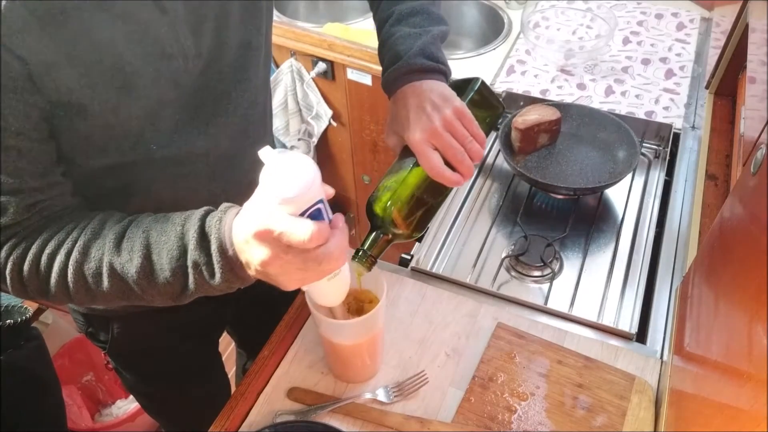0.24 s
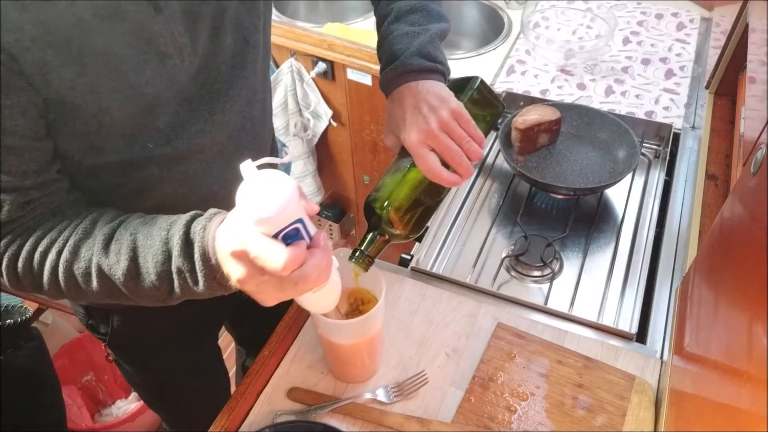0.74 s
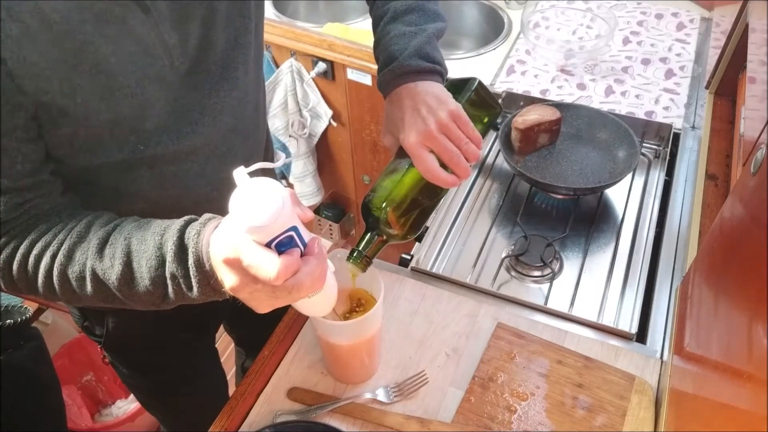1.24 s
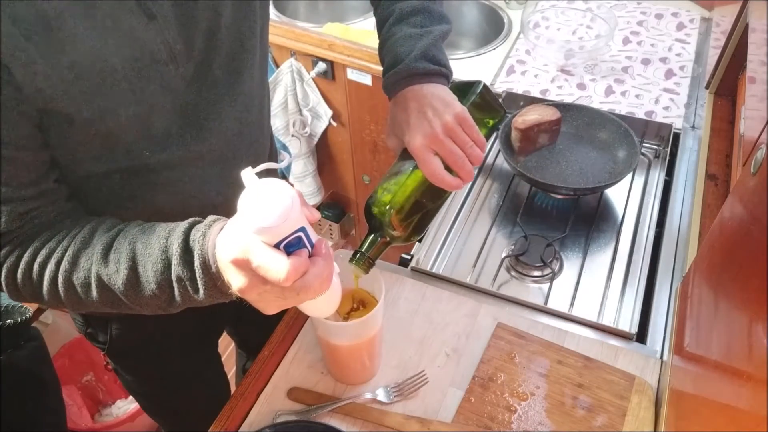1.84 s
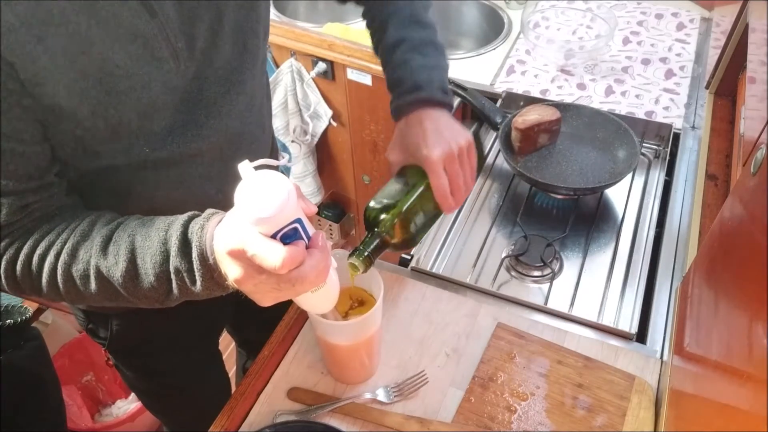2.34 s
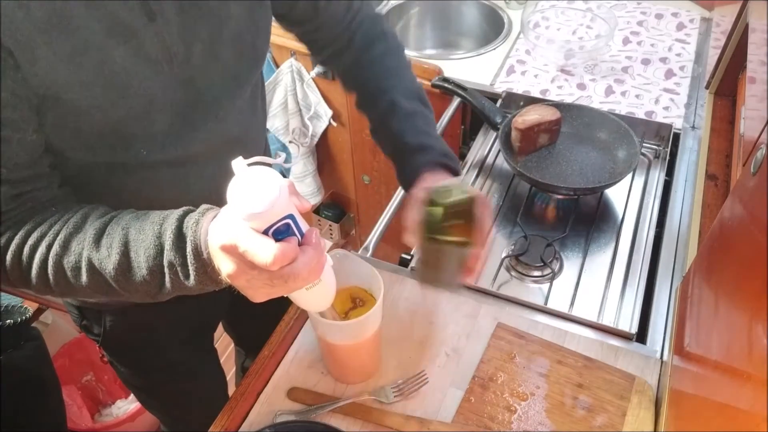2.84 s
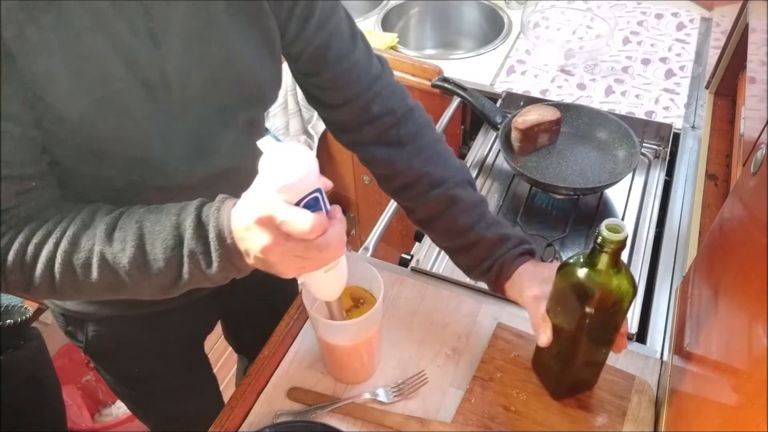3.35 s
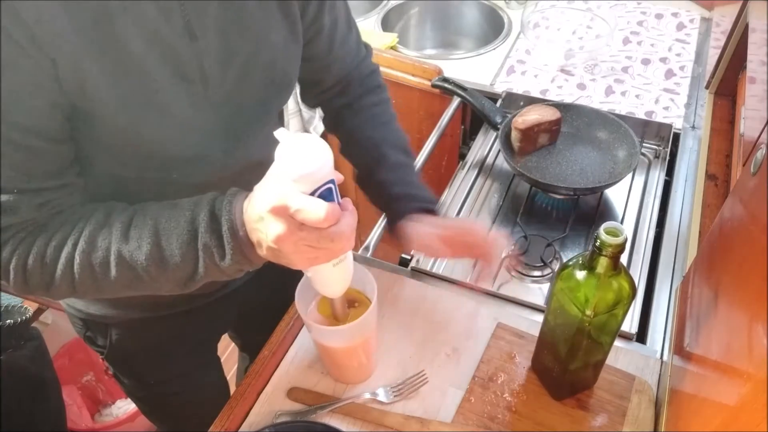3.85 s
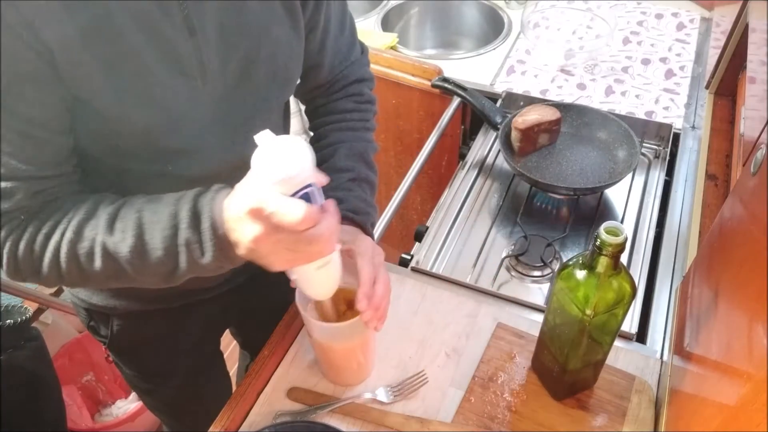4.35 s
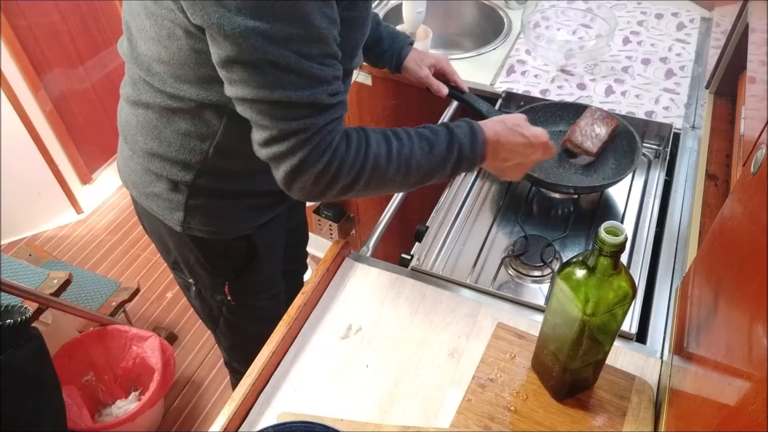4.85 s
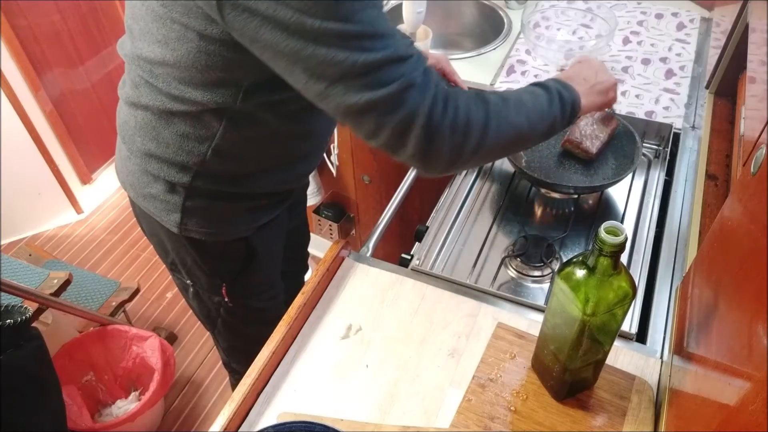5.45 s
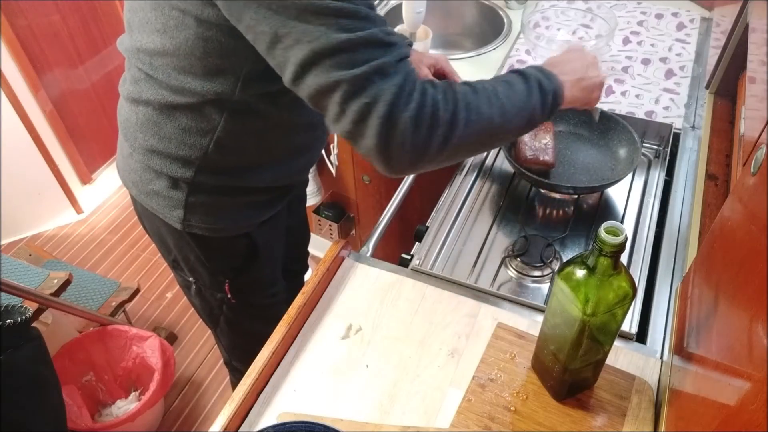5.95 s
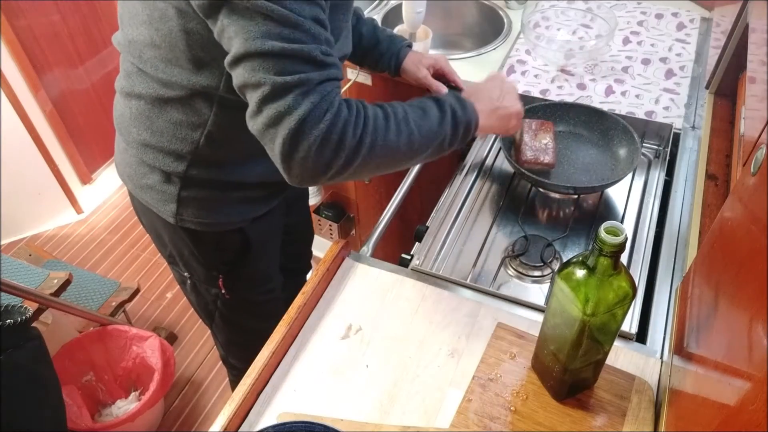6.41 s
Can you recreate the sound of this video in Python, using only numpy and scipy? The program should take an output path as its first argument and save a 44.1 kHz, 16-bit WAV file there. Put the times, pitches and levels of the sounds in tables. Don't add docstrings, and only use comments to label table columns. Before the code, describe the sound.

Close up in a small wooden galley, a stick blender coasts to a stop, then buzzes and churns thick sauce in a plastic beaker. Fat spits sharply in a pan throughout. The blender stops, a glass bottle lands on a board with a hard thud, and a splashier, uneven blender run follows. An abrupt cut leaves dense fish sizzle, a low burner roar and wind buffeting the microphones.

```python
import sys
import numpy as np
from scipy import signal
from scipy.fft import rfft, irfft
from scipy.io import wavfile
from scipy.ndimage import uniform_filter1d

SR = 44100
rng = np.random.default_rng(int(sys.argv[2]) if len(sys.argv) > 2 else 0)


def master(y):
    cut = np.clip(np.atleast_2d(y).T, -1, 1)
    pcm = np.round(cut * 32767)
    wavfile.write(sys.argv[1], SR, pcm.astype(np.int16))


def voltage_ratio(level):
    return 10 ** (np.asarray(level, float) / 20)


N = 294588
T, HZ = np.arange(N) / SR, np.fft.rfftfreq(N, 1 / SR)
SIDES = np.array([[.5], [-.5]])
CHANGE_S = 4.82
COAST_S = .45
PAN_SAME, PAN_LAG = .4, 51


def evened(x):
    return x / np.sqrt(np.mean(x ** 2) + 1e-20)


def read(points, hz=HZ):
    f, value = np.transpose(points)
    return np.interp(np.log(hz + 1), np.log(f + 1), value)


def coloured(x, db):
    return irfft(rfft(x) * voltage_ratio(db), N)


def drift(hz, count=1):
    spacing = 64
    points = N // spacing + 2
    smoothing = 1 + (np.fft.rfftfreq(points, spacing / SR) / hz) ** 2
    slow = irfft(rfft(rng.standard_normal((count, points))) / smoothing, points)
    return evened(np.array([np.interp(np.arange(N) / spacing, np.arange(points), row) for row in slow]))


def bumps(rows):
    s, db, length = np.transpose(rows)[..., None]
    return (db * np.exp(-((T - s) / length) ** 2)).sum(0)


def paired(same, phase=0., balance_db=0.):
    a, b = rfft(rng.standard_normal((2, N)))
    same = np.clip(same, 0, 1)
    right = same * a * np.exp(-1j * phase) + np.sqrt(1 - same ** 2) * b
    return irfft(np.array([a * voltage_ratio(balance_db / 2), right * voltage_ratio(-balance_db / 2)]), N)


def add_at(out, s, sound):
    out[:, round(s * SR):][:, :sound.shape[1]] += sound


def galley(x, wet_db):
    # frequency in Hz, time to fall 60 dB in seconds
    room_decay = [(200, 0.26), (1000, 0.42), (4000, 0.14), (16000, 0.06)]
    taps = np.zeros((2, 16000))
    at = np.arange(60, 15900, 20) + rng.integers(0, 20, (2, 792))
    np.put_along_axis(taps, at, rng.choice([-1., 1.], at.shape), 1)
    hz, t, z = signal.stft(taps, SR, nperseg=256)
    dying = voltage_ratio(-60 * t / read(room_decay, hz)[:, None])
    tail = signal.istft(z * dying, SR, nperseg=256)[1]
    tail /= np.linalg.norm(tail[0])
    return x + voltage_ratio(wet_db) * signal.fftconvolve(x, tail, axes=1)[:, :N]


def motor(press, hand, run_hz):
    on_s, off_s, rise_s, churn_db, hum_db, hiss_db = press
    at, *columns = np.transpose(hand)
    lift_db, pressed_db = (np.interp(T, at, c) for c in columns)
    since, after = np.maximum(T - on_s, 0), np.clip(T - off_s, 0, COAST_S)
    short = .2 * np.exp(-since / .06)
    shaft_hz = run_hz * (1 - short) - 70 * after
    shaft_hz = shaft_hz - .45 * np.maximum(-lift_db - 3, 0)
    churn_db = churn_db - 14 * np.maximum(1 - since / rise_s, 0) ** 2 - .2 * lift_db
    churn_db = churn_db - 110 * after - 4 * (1 - np.exp(-after / 0.059))
    hum_db = hum_db + pressed_db - 108 * short * .7 - 400 * after
    over_db = np.minimum(hiss_db + lift_db + 28 * after, 0)
    end_s = min(off_s + COAST_S, CHANGE_S)
    on = np.clip(np.minimum(T - on_s, end_s - T) / .004, 0, 1)
    return on, shaft_hz, churn_db, hum_db, over_db


def resonate(x, hz, width):
    turn = np.exp(2j * np.pi * np.cumsum(hz * np.ones(N)) / SR)
    r = np.exp(-np.pi * width / SR)
    return 2 * (turn * signal.lfilter([1 - r], [1, -r], x / turn + 1e-18)).real


def ringing(x, body):
    shape = 0
    for k, (f, width, db) in enumerate(body):
        shape = shape + (-1) ** k * voltage_ratio(db) / np.sqrt(width) / (1 + 2j * (HZ - f) / width) ** 2
    return irfft(rfft(x) * shape, N)


def burst(controls, orders, body, hiss, main_width, main_db, slosh_db, hiss_db, follow):
    # frequency in Hz, left-right likeness
    near_same = [(100, 0.8), (200, 1), (360, 0.75), (730, 0.05), (900, 1.1), (1270, 0.54), (2100, 0.5),
                 (4400, 1.5), (9000, 1)]
    # frequency in Hz, radians by which the left leads
    near_phase = [(200, 0.27), (360, -2), (540, 2.3), (900, -0.5), (1040, -1.07), (1270, -3), (1660, 3),
                  (4400, -2.5), (6300, 0.5)]
    # frequency in Hz, left-right difference in dB
    near_balance = [(60, -1), (99, 2), (160, -4.5), (270, -2), (450, -9), (740, 3), (1220, -3), (2010, 0.5),
                    (3330, -1.5), (5500, -1.0), (9080, 1), (15000, 33)]
    # frequency in Hz, density in dB per Hz
    slosh_colour = [(35, -73), (68, -18), (129, -17), (176, -1), (252, -13), (415, -12), (664, -3.5),
                    (1010, -8.5), (1770, -12), (2500, -21), (3250, -65), (5500, -120)]
    press, hand, run_hz, air = controls
    on, shaft_hz, churn_db, hum_db, over_db = motor(press, hand, run_hz)
    air_s, *air = np.transpose(air)
    air_hz, surge_db = (np.interp(T, air_s, c) for c in air)

    turns = 2 * np.pi * np.cumsum(shaft_hz * (1 + .003 * drift(8)[0])) / SR
    wobble = voltage_ratio(0.73 * drift(5.9, count=len(orders) + 1))
    tone = np.sin(turns - np.array([[0], [.2]])) * voltage_ratio([[-1.3], [1.3]])
    hum = np.sqrt(2) * voltage_ratio(hum_db) * wobble[0] * tone
    for (k, db), w in zip(orders, wobble[1:]):
        skew, lean = read(near_phase, k * 182.), read(near_balance, k * 182.)
        tuned_db = 4. / (1 + ((k * shaft_hz - air_hz) / 25) ** 2)
        level = voltage_ratio(churn_db + db + tuned_db - 5 + lean * SIDES)
        hum += level * w * np.sin(k * turns + rng.uniform(0, 2 * np.pi) + skew * SIDES)

    stir = paired(read(near_same), read(near_phase), read(near_balance))
    stir *= (1 + 0.15 * np.cos(turns)) * voltage_ratio(1.21 * drift(18))
    column = resonate(stir, air_hz, main_width) / np.sqrt(main_width)
    slow = abs(uniform_filter1d((column ** 2).mean(0), size=1000)) / np.mean(column ** 2) + .05
    column_db = main_db + surge_db + 0.38 * follow * (over_db + 10.5)
    column = column * voltage_ratio(column_db) / slow ** (.75 / 2)
    walls = ringing(stir, body) * voltage_ratio(follow * (over_db + 4.5))
    beaker = column + walls
    churn = beaker / np.sqrt(np.mean(beaker[:, on > 0] ** 2))
    churn = churn + voltage_ratio(slosh_db) * evened(coloured(stir, read(slosh_colour)))

    mist = paired(.12, 0., read(near_balance))
    mist = mist * (1 + 0.11 * np.cos(turns)) * voltage_ratio(.9 * drift(21))
    spray = voltage_ratio(hiss_db + over_db) * evened(coloured(mist, read(hiss)))
    return on * (hum + voltage_ratio(churn_db + 2.5) * (churn + spray))


def blender():
    # on and off in seconds, rise in seconds, churn in dB, hum in dB,
    # blade hiss over churn in dB
    presses = [
        (-1.0, -0.1, .05, -20, -22, -6),
        (0.441, 2.315, 0.045, -20, -28.5, -8),
        (3.425, 9.0, .1, -21.5, -25.5, 1.5),
    ]
    # time in seconds, blade lift in dB, beaker on counter in dB
    hands = [
        [(0.0, 1, 3)],
        [(0.6, 1.5, -0.5), (0.76, 1, -2.5), (0.86, 1.5, -11), (0.95, 0.0, -0.5), (2.0, 0.5, 0.5),
         (2.3, 0.5, -1)],
        [(3.42, -3, -1), (3.5, -14.5, -10), (3.65, 1.5, 0.5), (4.4, -3, -1.5), (4.46, -5, -7), (4.55, -2, -8),
         (4.63, -11.5, -19), (4.8, -19.5, -6)],
    ]
    # time in seconds, pitch in Hz, surge in dB
    air_columns = [
        [(0, 1040, 0)],
        [(.46, 960, 0), (.5, 1005, 1), (.525, 1015, -3), (.55, 1035, 3), (.62, 1065, 0), (.71, 1020, 6),
         (.82, 1040, -4), (.86, 1065, 2), (.95, 1025, 1), (.972, 1015, -6), (1.004, 1010, 5), (1.05, 1027, 0.5),
         (1.34, 1023, -4.5), (1.37, 1013, 1), (1.64, 1020, -5), (1.736, 1024, 2.5), (1.76, 1022, -3.5),
         (2.3, 1027, -3)],
        [(3.47, 1000, -10), (3.485, 1010, 2), (3.53, 1052, 3), (3.59, 1055, 1), (3.64, 1005, -1),
         (3.74, 1045, 2), (3.79, 1040, -6), (3.95, 1020, -1), (4.0, 1030, -5), (4.15, 1035, -1),
         (4.38, 1000, -6), (4.45, 1000, 1), (4.51, 1005, 2), (4.57, 1000, -3), (4.62, 1063, 1),
         (4.66, 1063, -3), (4.75, 1060, 0), (4.82, 1052, -1)],
    ]
    # multiple of the shaft rate, level in dB
    orders_deep = [(2, -8.5), (3, -11.5), (4, -8), (5, -7.5), (6, -7.5), (7, 0.5), (12, -17), (14, -17)]
    orders_lifted = [(2, -12), (3, -19), (4, -31), (5, -12), (6, 3.5), (7, -2), (9, -8), (12, -26),
                     (14, -17)]
    # pitch in Hz, width in Hz, level in dB
    body_deep = [(730, 30, -10), (902, 85, -4), (1104, 79, -7), (1264, 75, 2), (1500, 300, -9.5)]
    body_lifted = [(240, 69, -11), (763, 40, -12), (885, 70, -6), (1250, 99, 5), (1655, 60, 0),
                   (2200, 89, -20)]
    # frequency in Hz, density in dB per Hz
    hiss_deep = [(45, -26), (90, -7), (1060, -15), (1800, -3.5), (2280, -4.5), (2610, 0), (3580, -3.5),
                 (4440, -4), (4840, -6), (6050, -10.5), (6560, -7), (7710, -15), (9000, -8), (11700, -17.5),
                 (19800, -120)]
    hiss_lifted = [(45, -18), (90, -15), (1060, -12.5), (1800, 1), (1900, -15), (2080, -1.5), (2360, -4.5),
                   (2650, -1), (3560, -6.5), (4570, -6.5), (5690, -10), (6330, -7.5), (7590, -12.5),
                   (8570, -11), (11000, -18.5), (14300, -41), (22000, -120)]
    run_hz = (181.3, 181.3, 184.6)
    first, second, third = zip(presses, hands, run_hz, air_columns)
    coast = burst(first, orders_deep, body_deep, hiss_deep,
                  main_width=200, main_db=-9, slosh_db=-3, hiss_db=7.0, follow=.05)
    deep = burst(second, orders_deep, body_deep, hiss_deep,
                 main_width=30, main_db=1.5, slosh_db=-8, hiss_db=2.0, follow=0.1)
    lifted = burst(third, orders_lifted, body_lifted, hiss_lifted,
                   main_width=40, main_db=5.0, slosh_db=-9, hiss_db=4.0, follow=.9)
    return coast + deep + lifted


def activity(flurries, calm_db):
    s, db, rise, fall = np.transpose(flurries)[..., None]
    swell = voltage_ratio(db) * np.exp(-np.where(T < s, (s - T) / rise, (T - s) / fall))
    return 10 * np.log10(voltage_ratio(calm_db) ** 2 + (swell ** 2).sum(0))


def frying(flurries, colour, calm_db, low_db, per_s, spread_db, clump_db, smooth_db, low_hz, wet_db):
    # time in seconds, change in dB, length in seconds
    lulls = [(.08, 0, .02), (.2, -1, 0.034), (2.617, -6, 0.014), (2.697, -4, .007), (2.73, -1, 0.013),
             (3.32, 0, .01)]
    # frequency in Hz, left-right difference in dB
    pan_balance = [(60, -2), (110, -3), (200, -4), (380, -12), (700, 5), (1290, -1.5), (2380, -1.5),
                   (4400, -2), (8120, 0.5), (15000, 5.5)]
    fizz_db = activity(flurries, calm_db) + bumps(lulls)
    low_db = low_db - 0.59 * np.maximum(fizz_db - calm_db, 0)
    low_db = low_db + 6 * np.clip((T - 5.89) / 0.027, 0, 1)

    clumps = voltage_ratio(clump_db * drift(42))
    size = voltage_ratio(spread_db * np.minimum(rng.exponential(1, (2, N)), 5))
    size = size * rng.choice([-1., 1.], (2, N))
    clicks = size * (rng.random(N) < per_s * clumps / SR)
    left = PAN_SAME * clicks[1] + np.sqrt(1 - PAN_SAME ** 2) * clicks[0]
    clicks = np.array([np.roll(left, PAN_LAG), clicks[1]])
    fine = paired(PAN_SAME, -2 * np.pi * HZ * PAN_LAG / SR) * np.sqrt(clumps)
    fat = evened(galley(clicks, wet_db)) + voltage_ratio(smooth_db) * fine

    lean = read(pan_balance) * SIDES
    whole = rfft(fat) * voltage_ratio(read(colour, np.minimum(HZ, 15400)) + lean)
    whole /= np.sqrt(np.mean(irfft(whole, N) ** 2))
    low = irfft(whole * voltage_ratio(-10 * np.log10(1 + (HZ / low_hz) ** 6)), N)
    crackle = low * (voltage_ratio(low_db + 8.5) - 1)
    return voltage_ratio(fizz_db + 9.5) * (irfft(whole, N) + crackle)


def spitting_fat():
    # peak time in seconds, level in dB, build-up in seconds, dying in seconds
    spit_flurries = [(.04, -26, 0.036, 0.011), (.13, -32, 0.017, .08), (.24, -29.5, .004, 0.05),
                     (.41, -31.5, .06, .03), (.55, -31.5, .05, 0.12), (.79, -29, 0.062, 0.46),
                     (1.35, -35.5, .2, .3), (2.21, -30.5, 0.092, 0.027), (2.53, -31.5, 0.15, 0.027),
                     (2.631, -31, .001, 0.08), (2.706, -25, .001, .008), (2.753, -30.5, .001, .012),
                     (3.0, -31.5, 0.11, .1), (3.29, -30, 0.24, .012), (3.34, -29, 0.0092, 0.014),
                     (3.8, -33.5, 0.29, .3), (4.35, -32.5, 0.25, 0.061), (4.55, -35, .006, 0.088)]
    # frequency in Hz, density in dB per Hz
    spit_colour = [(710, -56), (1200, -23), (1450, -28), (1880, -12.5), (2730, -11.5), (2940, -9),
                   (3680, -10), (4460, -6.5), (4970, -8), (5240, -4.5), (6700, 1), (14600, 0.5),
                   (15400, -7.5)]
    fat = frying(spit_flurries, spit_colour, calm_db=-37, low_db=-3.0, per_s=1500, spread_db=1.3,
                 clump_db=1.0, smooth_db=-4.5, low_hz=4530, wet_db=-3.5)
    return fat * (T < CHANGE_S)


def pops():
    # start in seconds, peak in
    # dB, pitch in Hz, left-right in dB
    single_spits = [(0.0412, -6, 6850, 2), (0.1181, -12, 11800, -1), (0.2374, -7.5, 13100, 2.5),
                    (0.3361, -19, 6940, -0.5), (0.352, -8, 7010, -0.5), (0.4, -11, 7710, 1.0),
                    (0.5516, -4, 10600, 3.5), (0.7632, -9, 6610, 2.0), (1.1448, -9, 11700, 2.5),
                    (1.2131, -6, 7280, 0.5), (1.2705, -13, 9020, 1.5), (1.283, -11, 5910, 3),
                    (1.5269, -12, 13000, 2.0), (1.5404, -5, 7250, 2.0), (1.6631, -13, 8600, 1.5),
                    (1.6801, -9, 7020, 1.5), (2.17, -14, 13200, 2.0), (2.1924, -12, 7230, -1),
                    (2.36, -8, 7610, 3.0), (2.3989, -12, 7620, -2), (2.4643, -12, 11000, 3.0),
                    (2.4972, -14, 6890, 1.0), (2.5207, -8, 13100, 3.0), (2.5556, -15, 9800, -0.5),
                    (2.5706, -8, 14000, 2.0), (2.6304, -12, 7300, 1), (2.6584, -11, 9820, 2.5),
                    (2.7053, -9, 10600, 2.0), (2.7521, -12, 12400, 4.5), (2.8563, -15, 12500, 3.0),
                    (2.8948, -8, 6500, -6), (3.041, -7, 8800, 2.5), (3.1353, -14, 6900, 1.5),
                    (3.1622, -9, 13100, 1.5), (3.1797, -9, 13000, 2.5), (3.2131, -13, 9180, 2.0),
                    (3.2377, -10, 7000, -3), (3.2715, -15, 7680, 3), (3.3388, -11, 7670, 2),
                    (3.7489, -15, 6750, -2), (4.1106, -10, 6150, 1), (4.15, -4, 6600, 4),
                    (4.5441, -8, 6320, 1.5), (4.6184, -10, 13100, 4), (4.8185, -6, 10200, 6),
                    (4.8514, -10, 11000, 2.5), (5.7319, -15, 12500, 2.5), (6.3936, -10, 10000, 5),
                    (6.5095, -11, 9960, 5),
                    (2.574, -13, 9000, 2), (2.635, -12, 7500, 2), (2.708, -13, 8000, 2),
                  (2.76, -15, 12000, 2), (2.878, -19, 4600, 0), (2.962, -15, 4360, 0),
                  (3.022, -17, 3000, 0), (3.089, -15, 8000, 2), (3.14, -19, 2920, 0), (3.289, -9, 8000, 2),
                  (5.781, -12, 9000, 2), (6.228, -13, 8000, 2), (6.56, -14, 9000, 2)]
    out, t = np.zeros((2, N + 2000)), np.arange(2000) / SR
    for s, peak_db, hz, pan_db in single_spits:
        noise = rng.standard_normal((2, len(t)))
        cycles = np.sin(2 * np.pi * hz * t + rng.uniform(0, 2 * np.pi, (2, 1)))
        snap = cycles * np.exp(-t / 0.00038) * np.minimum(t / 0.000063, 1)
        wake = 0.23 * np.diff(noise, prepend=0) * np.exp(-t / 0.004)
        add_at(out, s, voltage_ratio(peak_db + 3 + pan_db * SIDES) * (snap + wake))
    return galley(out[:, :N], wet_db=-3.5)


def touches():
    # start in seconds, peak in dB, pitch in Hz, time to fall 60 dB in seconds
    contacts = [(0.0, -34, 124, 0.18), (2.41, -25, 199, 0.27), (2.44, -29, 297, .1),
                (2.46, -29, 422, 0.073), (2.962, -36, 646, 0.022), (2.964, -27, 1500, 0.025),
                (3.37, -28.5, 70.5, 0.68), (3.43, -18, 400, .06), (3.74, -14, 236, 0.093),
                (3.831, -16, 240, 0.11), (4.435, -23, 160, 0.053), (4.451, -20, 420, 0.041),
                (4.54, -13, 420, 0.058), (3.665, -20, 1650, .12), (4.49, -17, 1660, .12),
                (4.55, -19, 1680, .12), (4.65, -19, 240, 0.18), (4.99, -37, 445, 0.3),
                (5.47, -43, 820, 0.3), (5.499, -37, 440, 0.5), (5.62, -39, 457, 0.33),
                (6.355, -30, 200, 0.4)]
    out, t = np.zeros((2, N + SR // 2)), np.arange(SR // 2) / SR
    for s, peak_db, hz, t60 in contacts:
        phase = rng.uniform(0, 2 * np.pi, 2)
        ring = np.sin(2 * np.pi * hz * t + phase[0] * SIDES * min(hz / 900, 1))
        ring = ring + 0.36 * np.sin(2 * np.pi * 1.13 * hz * t + phase[1])
        rise = 1 - np.exp(-t / (0.068 * t60))
        add_at(out, s, voltage_ratio(peak_db - 60 * t / t60) * rise * ring)
    return galley(out[:, :N], wet_db=-10.0)


def cabin():
    # frequency in Hz, density in dB per Hz
    murmur_colour = [(12, -27), (20, -18), (97, -13), (134, -13.5), (167, -25), (204, -7), (318, -31),
                     (440, -22.5), (507, -29.5), (572, -22.5), (633, -42), (840, -20.5), (967, -28.5),
                     (1450, -28), (2500, -24.5), (3250, -41), (5500, -120)]
    # frequency in Hz, left-right likeness
    murmur_same = [(40, 0.76), (200, 0.84), (360, 0.59), (540, 0.25), (900, 0.13), (2500, 0.034)]
    # frequency in Hz, gain in dB
    colour_before = [(130, 1.5), (200, -5), (300, -0.5)]
    colour_after = [(100, -1.5), (137, 2.5), (165, 1), (200, -0.5), (235, 0), (300, 0.5)]
    level_db = -45 + 3.5 * (T >= CHANGE_S) + 1.86 * drift(9.6)
    murmur = evened(coloured(paired(read(murmur_same)), read(murmur_colour)))
    earlier, later = coloured(murmur, read(colour_before)), coloured(murmur, read(colour_after))
    return voltage_ratio(level_db) * np.where(T < CHANGE_S, earlier, later)


def wind():
    # time in seconds, level change in dB, length in seconds
    buffets = [(4.9, 6, .04), (4.97, 5, .025), (5.05, 6, .03), (5.2, 2, .05), (5.4, 5, 0.04),
               (5.48, 6, .03), (5.56, 5, 0.03), (5.65, 4, .03), (5.95, 6, 0.05), (6.15, 4, .04),
               (6.28, 5, 0.03), (6.35, 6, .025), (6.45, 6, .04), (6.55, 5, 0.03), (6.62, 4, 0.02)]
    level_db = -58.5 + 23.5 * (T >= CHANGE_S) + 2 * drift(4.5)[0] + bumps(buffets)
    rumble = [(.5, -51), (2.5, 7.5), (6, 5.5), (14, -5), (28, -14), (50, -20), (75, -50), (150, -64)]
    return voltage_ratio(level_db) * evened(coloured(paired(0.91), read(rumble)))


def bottle():
    # start in seconds, peak in dB, brightness in dB
    blows = [
        (3.348, -3, 10.5),
        (3.431, -26, 20),
    ]
    # pitch in Hz, level in dB, time to fall 60 dB in seconds
    board_modes = [(205, 6, 0.22), (245.4, 5, 0.22), (225, 7, 0.045), (379, -3, 0.19), (465, -3, 0.16),
                   (520, -3, 0.05), (635, -8.5, 0.048), (754, -10, .06), (1000, -7.5, 0.028),
                   (1180, -11.5, 0.018), (1380, -8.5, 0.013), (1600, -10, 0.02), (1960, -15, 0.019),
                   (2690, -29, 0.033)]
    out, t = np.zeros((2, N)), np.arange(SR // 2) / SR
    for s, peak_db, bright_db in blows:
        for hz, db, t60 in board_modes:
            skew = rng.uniform(-1.43, 1) * min(hz / 900, 1) ** 2 * np.array([[1], [-1]])
            swell = np.minimum(t * hz / 0.51, 1)
            ring = -np.sin(2 * np.pi * hz * t + skew) * swell
            mode_db = peak_db - 6.5 + db + bright_db * np.log2(hz / 500) / 2
            add_at(out, s, voltage_ratio(mode_db - 60 * t / t60) * ring)
        band = signal.butter(2, [170, 560], 'band', fs=SR)
        thud = evened(signal.lfilter(*band, rng.standard_normal(len(t))))
        thud = voltage_ratio(peak_db - 17 - 60 * t / 0.21) * np.minimum(t / 0.0032, 1) * thud
        add_at(out, s, thud[None])
    return galley(out, wet_db=-12)


def searing_steak():
    # peak time in seconds, level in dB, build-up in seconds, dying in seconds
    sear_flurries = [(4.88, -22, 0.096, 0.073), (5.1, -30, 0.27, 0.47), (5.74, -24, 0.081, 0.17),
                     (5.9, -30, .01, .04), (5.99, -27, 0.05, 0.08), (6.13, -30, .04, .1),
                     (6.3, -29, .15, .3)]
    # frequency in Hz, density in dB per Hz
    sear_colour = [(710, -33), (1200, -26), (1600, -22), (1760, -18), (2070, -15.5), (3170, -11),
                   (3450, -11), (4320, -9), (4610, -8.5), (5580, -6.5), (6620, -4.5), (8650, -2),
                   (15400, -3.5)]
    fat = frying(sear_flurries, sear_colour, calm_db=-34.5, low_db=-8, per_s=5000, spread_db=2.5,
                 clump_db=1.0, smooth_db=-8, low_hz=6100, wet_db=3)
    return fat * (T >= CHANGE_S)


def scene():
    pan = spitting_fat() + pops() + searing_steak()
    return blender() + pan + touches() + cabin() + wind() + bottle()


def gate(x):
    hz, t, z = signal.stft(x, SR, nperseg=1024, noverlap=768)
    power = (abs(z) ** 2).mean(0) + 1e-20
    spot = uniform_filter1d(uniform_filter1d(power, size=3, axis=0), size=7, axis=1)
    around = uniform_filter1d(uniform_filter1d(power, size=41, axis=0), size=7, axis=1)
    over_db = 10 * np.log10(abs(spot / around))
    weak = np.clip((-.7 - hz[:, None] / 20000 - over_db) / 1.5, 0, 1) * (hz[:, None] > 2600)
    return signal.istft(z * voltage_ratio(-20. * weak), SR, nperseg=1024, noverlap=768)[1][:, :N]


def low_pass(x):
    return signal.sosfilt(signal.butter(12, 16460, fs=SR, output="sos"), x)


def record(dry):
    side = coloured(dry[0] - dry[1], -10 * np.log10(1 + (140 / (HZ + 40)) ** 2))
    near = dry.mean(0) + side * SIDES
    limited = np.clip(gate(near), -1, 1)
    mix = coloured(limited, -90. * (HZ > 15850))
    return low_pass(mix)


dry = scene()
out = record(dry)
master(out)
```